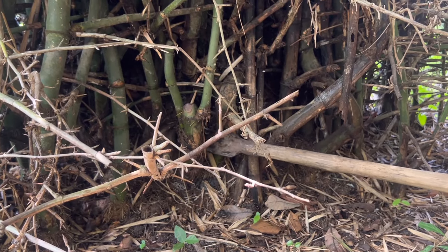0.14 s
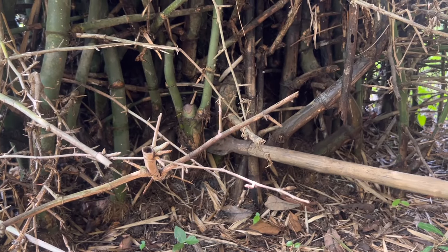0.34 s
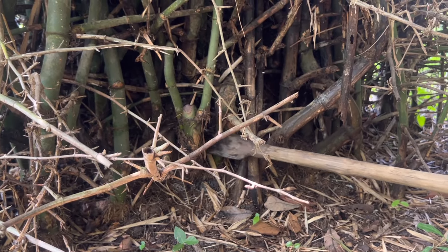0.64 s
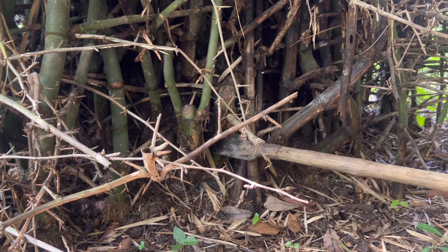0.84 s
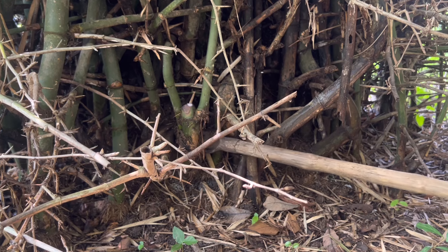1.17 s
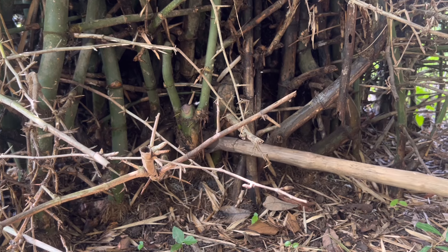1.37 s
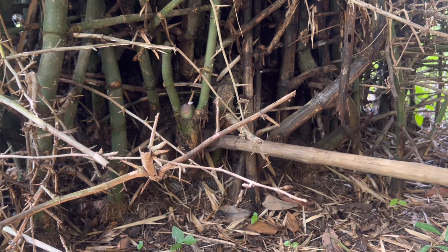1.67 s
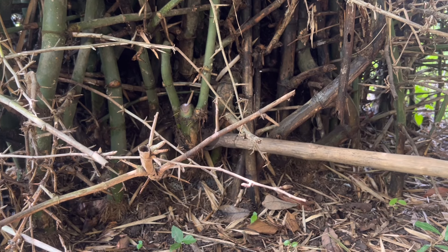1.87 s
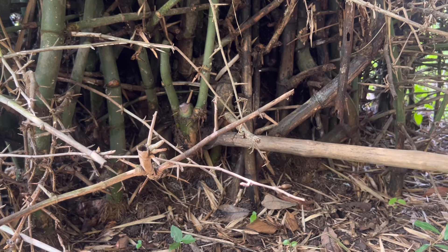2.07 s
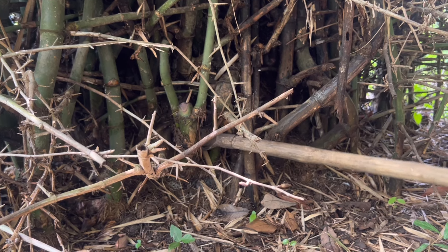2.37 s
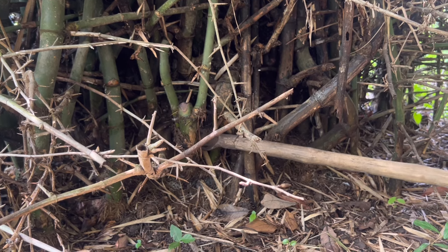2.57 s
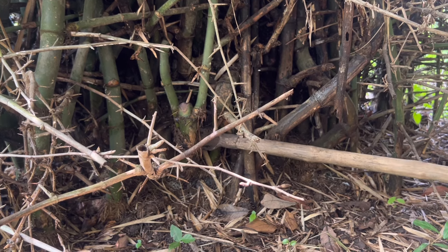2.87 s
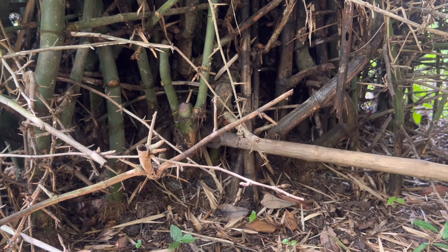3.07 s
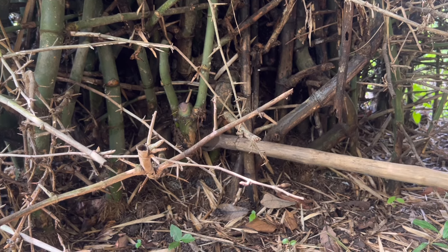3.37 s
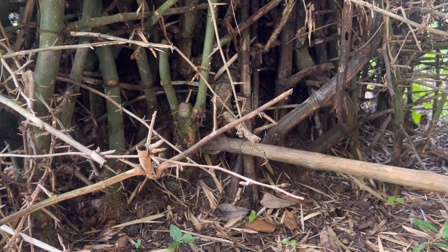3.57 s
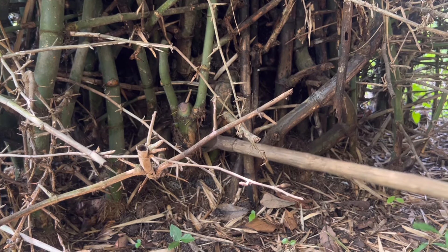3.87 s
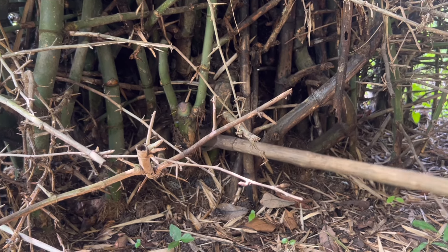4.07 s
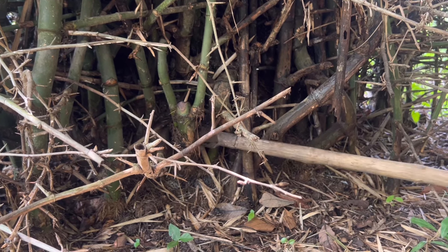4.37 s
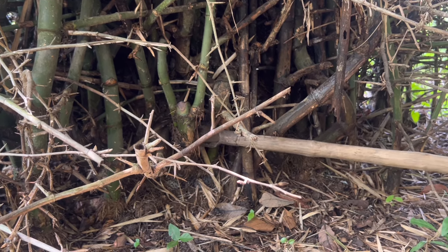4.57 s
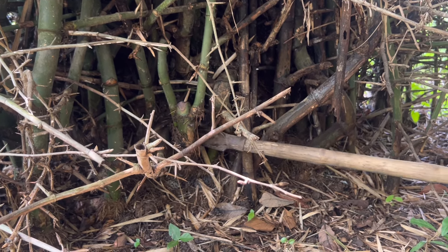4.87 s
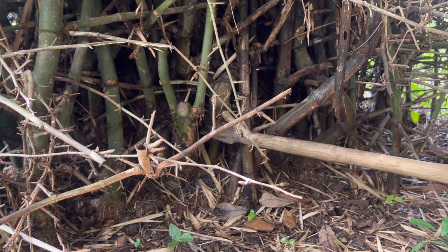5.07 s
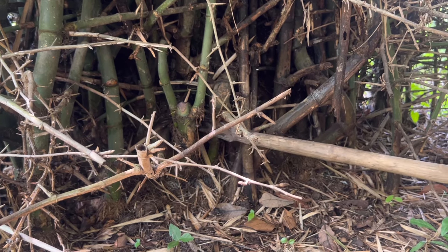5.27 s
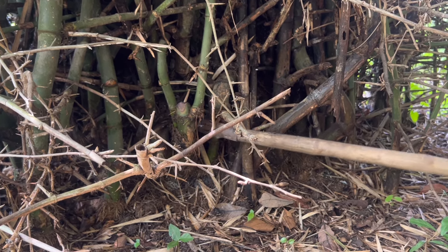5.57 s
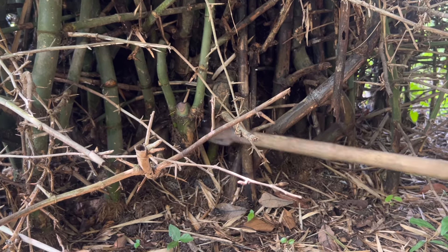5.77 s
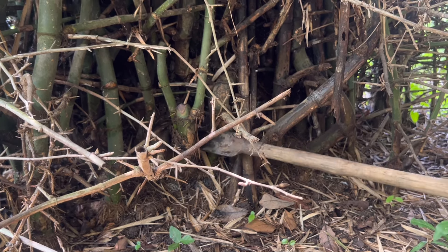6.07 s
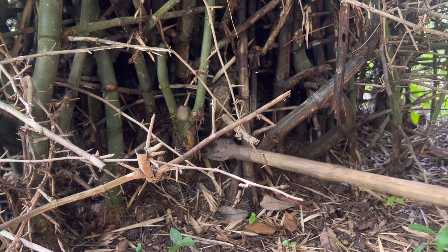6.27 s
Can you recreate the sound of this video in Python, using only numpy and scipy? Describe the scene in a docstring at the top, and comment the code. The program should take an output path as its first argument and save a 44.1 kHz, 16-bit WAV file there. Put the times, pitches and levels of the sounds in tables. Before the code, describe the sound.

Close by, dry bamboo splits with crackling snaps while a blade on a long pole knocks into the stems. The loudest crack comes early and another crackling tear about halfway. After that, dull thuds and small cracks come more often over the rustle of dry leaves and twigs, with a bright snap near the end. Distant traffic hum and small bird whistles are barely audible in the forest.

```python
"""Dry bamboo tears and thuds as a long-handled blade is worked into a clump in a forest.
Fibres fracture in crackling bursts that excite the stem's resonances, and blows send dispersive
bending waves along the pole. Dry litter rustles under each stroke; late on, two taps ring a hollow stem.
Far traffic hums and small birds whistle. A nearby phone picks it all up through two ports."""
import sys
import numpy as np
from scipy import signal
from scipy.fft import rfft, irfft
from scipy.io import wavfile
from scipy.ndimage import uniform_filter1d

SR = 44100
rng = np.random.default_rng(int(sys.argv[2]) if len(sys.argv) > 2 else 0)


def wav_out(sig):
    """Save sig, one row per channel (or a flat mono array), as 16-bit PCM at SR to the path in sys.argv[1]."""
    wavfile.write(sys.argv[1], SR, np.round(np.clip(np.atleast_2d(sig).T, -1, 1) * 32767).astype(np.int16))


N = 284004


def gain_of(db):
    """Amplitude ratio of a level in decibels."""
    return 10 ** (np.asarray(db) / 20)


def unit_rms(x):
    """Normalisation to unit mean power."""
    return x / np.sqrt(np.mean(x ** 2) + 1e-20)


def curve_at(points, hz):
    """Interpolation on a logarithmic frequency axis."""
    f, value = np.transpose(points)
    return np.interp(np.log(hz + 1), np.log(f + 1), value)


def add(mix, start_s, sound):
    """Superposition of a sound on the mix from start_s on."""
    at = round(start_s * SR)
    part = mix[max(at, 0):][:len(sound) + min(at, 0)]
    part += sound[max(-at, 0):][:len(part)]


def filtered(x, response):
    """Linear filtering: the spectrum is multiplied by response(Hz)."""
    return irfft(rfft(x) * response(np.fft.rfftfreq(x.shape[-1], 1 / SR)), x.shape[-1])


def wander(rate_hz):
    """Random fluctuation: low-pass noise of unit rms."""
    return unit_rms(filtered(rng.standard_normal(N), lambda f: (f > 0) / (1 + (f / rate_hz) ** 2)))


def crackle(count, per_s, spread_db, hiss):
    """Shot noise: impulses of random sign and size over Gaussian hiss."""
    when, size, sign = rng.random((3, count))
    snaps = (when < per_s / SR) * gain_of(-spread_db * np.log(size + 0.016)) * np.sign(sign - .5)
    return unit_rms(unit_rms(snaps) + hiss * rng.standard_normal(count))


# strokes through the litter; the first row is not a stroke but a brief burst that opens the scene: (peak time
# [s], peak level [dB], 20 dB rise [s], 20 dB fall [s])
STROKES = [(0, -70, .1, 0.017), (.3, -60, 0.047, 0.047), (.44, -71.5, 0.26, 0.15), (.98, -56.5, 0.12, 0.12),
           (1.33, -69.5, 0.32, .4), (1.68, -65, 0.26, 0.19), (2.17, -66, 0.18, 0.51),
           (2.6, -65.5, 0.24, 0.79), (2.94, -52.5, 0.076, 0.14), (2.985, -42, 0.088, 0.03),
           (3.225, -49, 0.049, 0.053), (3.47, -59, 0.11, 0.073), (3.745, -56.5, 0.044, 0.13),
           (3.94, -63.5, 0.087, 0.18), (4.075, -53, 0.066, 0.074), (4.281, -48.5, 0.056, 0.06),
           (4.488, -68.5, 0.064, 0.44), (4.74, -56.5, 0.13, 0.069), (4.862, -54, 0.055, 0.05),
           (5.02, -61.5, 0.3, 0.038), (5.12, -62, 0.068, 0.13), (5.434, -54, 0.019, 0.092),
           (5.486, -54, 0.092, 0.029), (5.69, -56.5, 0.1, 0.15), (5.777, -48, 0.099, 0.025),
           (5.92, -64.5, 0.3, 0.14), (6.115, -59, .05, 0.11)]
def stroke_envelope(rest_db=-82, roundness=1.4):
    """Incoherent addition: the powers of the strokes sum over that of the resting litter."""
    t = np.arange(N) / SR
    power = gain_of(2 * rest_db)
    for peak_s, db, rise_s, fall_s in STROKES:
        from_peak = abs(t - peak_s) / np.where(t < peak_s, rise_s, fall_s)
        power = power + gain_of(2 * (db - 20 * from_peak ** roundness))
    return np.sqrt(power)


# spectrum of dry litter: (frequency [Hz], relative level [dB])
LITTER_SPECTRUM = [(60, -21.5), (280, 0.5), (900, -6.5), (2500, 3), (5000, 0.5), (9000, -1), (15000, -3)]
def litter_rustle():
    """Modulated shot noise: leaves and twigs crackle in clumps, with a drifting spectrum."""
    envelope = stroke_envelope() * gain_of(1.4 * wander(rate_hz=110))
    grains = crackle(N, per_s=900, spread_db=6.5, hiss=1.8)
    hz, _, spectra = signal.stft(grains, SR, nperseg=256)
    patches = uniform_filter1d(rng.standard_normal(spectra.shape), size=7, axis=0)  # across frequency
    patches = uniform_filter1d(patches, size=14, axis=1)  # across time
    spectra = spectra * gain_of(curve_at(LITTER_SPECTRUM, hz)[:, None] + 4.2 * unit_rms(patches))
    return envelope * unit_rms(signal.istft(spectra, SR, nperseg=256)[1][:N])


# spectrum of far traffic: (frequency [Hz], relative level [dB])
TRAFFIC_SPECTRUM = [(20, -30.5), (35, -9.5), (60, 2), (120, -13.5), (250, -23), (520, -33), (720, -27.5),
                    (1000, -20), (1650, -26), (2100, -38.5), (5000, -55.5), (16000, -42)]
def far_traffic(db=-61):
    """Broadband noise: rumble and tyre hum under a slight, slow amplitude modulation."""
    hum = filtered(rng.standard_normal(N), lambda f: gain_of(curve_at(TRAFFIC_SPECTRUM, f)))
    return gain_of(db + wander(rate_hz=1.5)) * unit_rms(hum)


# blows in the pole, with the 5.119 s row the bending wave of the 5.084 s blow returning from the pole's end:
# (time [s], peak level [dB], nominal frequency [Hz], sweep tilt [dB/octave])
THUDS = [(0.002, -36.5, 640, 0), (0.222, -50.5, 227, -7), (0.609, -41, 160, 3), (0.675, -47.5, 782, -13),
         (0.863, -38, 171, 2), (0.918, -42.5, 350, -15), (0.953, -33.5, 338, -4),
         (0.975, -40.5, 129.2, -6.5), (2.085, -48, 696, -18), (2.362, -52, 822, -21.5),
         (2.618, -48, 763, -18.5), (3.07, -46, 242, -8), (3.748, -31, 233.6, -16), (4.063, -26.5, 204, -3),
         (4.273, -49, 233, -11), (4.638, -53, 159, -4.5), (4.941, -44.5, 724, -15), (5.084, -27.5, 157, -3),
         (5.119, -35.5, 179.7, -5), (5.427, -47.5, 246, -9), (5.645, -32.5, 218, -2), (5.909, -48, 268, -6),
         (6.0937, -32.5, 177, 1.5), (6.279, -40.5, 292, -11.5), (6.313, -28.5, 763, -5)]
def pole_thud(start_s, db, hz, tilt_db):
    """Dispersion: short bending waves travel faster, so the treble arrives first and the pitch falls."""
    t = np.arange(9000) / SR
    cycles = t * hz
    sweep_hz = hz * 0.54 + 1.5 / (t + 0.0009)
    wave = np.sin(2 * np.pi * np.cumsum(sweep_hz) / SR) * gain_of(tilt_db * np.log2(sweep_hz / hz))
    passing = np.exp(-(cycles / 4.18) ** 4)  # the wave train lasts a few cycles
    noise = rng.standard_normal(len(t))
    rumble = unit_rms(filtered(noise, lambda f: (f / hz) ** 1.3 / (1 + (f / hz / 0.9) ** 4.5)))
    shudder = 1.3 * np.sqrt(hz / 250) * rumble * gain_of(-2.2 * cycles) * (1 - np.exp(-cycles / 1.7))
    thud = (wave * passing + shudder) * (1 - np.exp(-t / 0.00013))
    return start_s, gain_of(db) * thud / abs(thud).max()


# spectrum of tearing fibres: (frequency [Hz], relative level [dB])
TEAR_SPECTRUM = [(80, -26.5), (330, -9.5), (1000, -17.5), (1400, -5), (2500, -2), (5000, -3.5), (8000, 2),
                 (12000, -3), (16000, -5.5)]
# resonances of dry bamboo: (frequency [Hz], bandwidth [Hz], relative level [dB])
STEM_MODES = [(1320, 90, -0.5), (2060, 89, -4), (3730, 300, -4.5), (4800, 260, -1.5)]
# tearing bursts: (peak time [s], peak level [dB], rise time [ms], tilt above 2 kHz [dB/octave])
TEARS = [(0.0044, -50.5, 4.2, -4), (0.288, -24, 3.6, 0), (0.525, -50.5, 4.4, 0), (0.6083, -62, 5.5, -6),
         (0.68, -45.5, 3, 11.5), (0.867, -41, 0.94, -11.5), (0.953, -5.5, 4.16, -2),
         (0.9574, -12, 0.85, -2.5), (0.967, -13.5, 4.9, -4), (0.976, -19, 2.5, -3.5), (2.087, -57, 1.7, -9),
         (2.155, -43.5, 4.5, -3), (2.437, -45, 2.3, 11.5), (2.831, -37.5, 1.9, 2.1),
         (2.8623, -33.5, 0.42, 0.5), (2.8844, -44, 1.8, 0), (2.9111, -32, 0.92, 1),
         (2.9304, -25.5, 1.6, -3), (2.9738, -11, 5.7, 4), (2.9818, -14.5, 2.7, 3), (2.9883, -20, 1.52, 0),
         (3.0903, -50.5, 2.6, -10.5), (3.181, -36.5, 3.3, -0.5), (3.2212, -35.5, 4.1, -4),
         (3.2377, -42, 1.4, -3), (3.2507, -27.5, 1.9, 1), (3.7258, -38, 6.1, -4),
         (3.7454, -19.5, 2.9, -2.5), (3.8147, -33.5, 3.1, 4.5), (3.939, -45.5, 2.7, -2),
         (4.062, -23.5, 4.3, -4), (4.2736, -43, 1.1, -17), (4.738, -35.5, 11, 3.5),
         (4.9425, -45.5, 2.1, -5.5), (5.0355, -42.5, 6.2, 2.5), (5.0865, -40, 4.4, -3.5),
         (5.314, -55, 4, -4), (5.5185, -40, 2.7, 0), (5.644, -45.5, 1.5, -8.5), (5.9113, -33, 4.7, 2),
         (6.0942, -26.5, 0.53, -5), (6.1136, -14.5, 1.15, 13), (6.312, -44, 13.6, 3)]
def fibre_tear(peak_s, db, rise_ms, tilt_db):
    """Acoustic emission: fracture noise swells and dies, each burst ringing the stem a bit differently."""
    lead, rise_s = 2048, rise_ms / 1000
    t = (np.arange(8192) - lead) / SR
    t60 = 0.012 + 7.9 * rise_s  # a slower tear also dies more slowly
    envelope = np.where(t < 0, np.exp(-(t / rise_s) ** 2), gain_of(-60 * t / t60))
    envelope += 1.5 * np.exp(-abs(t) / 5e-4) * (t >= 0)  # the snap itself
    envelope += gain_of(-26 - 60 * t / 0.15) * (t > 0)  # scatter from the stems around
    fibres = crackle(len(t), per_s=10000, spread_db=-6.5, hiss=1.2) * envelope
    deviations = rng.standard_normal((len(STEM_MODES), 2)) * [4, .05]

    def response(f):
        modes = sum(gain_of(mode_db + extra_db) / (1 + 2j * (f - hz * (1 + detune)) / width)
                    for (hz, width, mode_db), (extra_db, detune) in zip(STEM_MODES, deviations))
        treble_db = tilt_db * np.log2(np.maximum(f, 2000) / 4000)
        return gain_of(curve_at(TEAR_SPECTRUM, f) + treble_db) * (1 + 2 * modes)

    burst = filtered(fibres, response)
    return peak_s - lead / SR, gain_of(db) * burst / abs(burst).max()


# bird whistles: (start [s], end [s], first frequency [Hz], last frequency [Hz], rms level [dB])
WHISTLES = [(0.055, 0.14, 3400, 3380, -85), (0.44, 0.545, 2665, 2880, -76), (.546, .6, 2750, 2680, -79),
            (0.778, 0.93, 2375, 2800, -75), (1.865, 1.9, 5700, 4400, -86), (1.89, 1.94, 4450, 4400, -89),
            (1.94, 2.09, 4500, 5750, -86), (3.81, 3.93, 4300, 5460, -86), (5.25, 5.395, 4400, 5600, -88),
            (5.986, 6.035, 2300, 2240, -79), (6.35, 6.44, 3750, 4650, -87)]
def bird_whistle(start_s, end_s, first_hz, last_hz, db):
    """Scattering: trees smear a gliding pure tone with echoes, the more so the higher it is."""
    progress = np.linspace(0, 1, round((end_s - start_s) * SR))
    bend = np.sin(np.pi / 2 * progress ** 1.3) ** 2
    hz = first_hz + (last_hz - first_hz) * bend
    tone = np.sin(2 * np.pi * np.cumsum(hz) / SR) * signal.windows.tukey(len(hz), .4)
    echoes = rng.standard_normal(4096) * np.exp(-np.arange(4096) / SR / .03) / 30
    echoes[0] = (2800 / last_hz) ** 3  # the direct sound
    return start_s, gain_of(db) * unit_rms(signal.oaconvolve(tone, echoes)[:len(tone) + 2048])


# modes of a hollow stem: (frequency [Hz], relative level [dB], 60 dB decay time [s])
HOLLOW_MODES = [(2273, 2, 0.042), (2620, 1.5, 0.03), (3065, -7, 0.019), (4130, -2, 0.028)]
# taps of the blade: (time [s], peak level [dB])
TAPS = [(5.912, -41.5), (6.093, -33)]
def stem_tap(start_s, db):
    """Free vibration: a short scratch of contact excites the damped modes of a hollow stem."""
    t = np.arange(4096) / SR
    ring = sum(gain_of(mode_db - 60 * t / t60) * np.sin(2 * np.pi * hz * t)
               for hz, mode_db, t60 in HOLLOW_MODES)
    contact = rng.standard_normal(len(t)) * np.exp(-t / 0.0017)
    tap = signal.oaconvolve(ring, contact)
    return start_s, gain_of(db) * tap / abs(tap).max()


# likeness of the two ports: (frequency [Hz], coherence [ratio])
COHERENCE = [(1500, 0.96), (15000, 0.94)]
def scene():
    """Partial coherence: all sources share one direction; a small part differs from port to port."""
    left = litter_rustle() + far_traffic()
    for play, table in ((fibre_tear, TEARS), (pole_thud, THUDS), (stem_tap, TAPS),
                        (bird_whistle, WHISTLES)):
        for row in table:
            add(left, *play(*row))
    hz, _, spectra = signal.stft(left, SR, nperseg=256, noverlap=192)
    coherence = curve_at(COHERENCE, hz)[:, None]
    scattered = 2 * spectra * np.exp(2j * np.pi * rng.random(spectra.shape))
    blend = coherence * spectra + np.sqrt(1 - coherence ** 2) * scattered
    right = signal.istft(blend, SR, nperseg=256, noverlap=192)[1][:N]
    return np.array([left, right])


# phase between the ports: (frequency [Hz], lead of left over right [rad])
PHASE_LEAD = [(0, 0), (1150, -.6), (1500, -1.9), (1800, 0), (2930, .6), (7400, 0), (9100, -2.7),
              (10800, -3.5), (11900, -5.9), (13600, -6.6), (15200, -9.4)]
def record(dry, cutoff_hz=15900):
    """Phase difference: the two ports shift the sound oppositely; a low-pass then limits the band."""
    ports = filtered(dry, lambda f: np.exp(.5j * np.outer([1, -1], curve_at(PHASE_LEAD, f))))
    low_pass = signal.firwin(511, cutoff_hz, window=("kaiser", 9), fs=SR)
    return signal.oaconvolve(ports, low_pass[None], "same")


dry = scene()
out = record(dry)
wav_out(out)
```